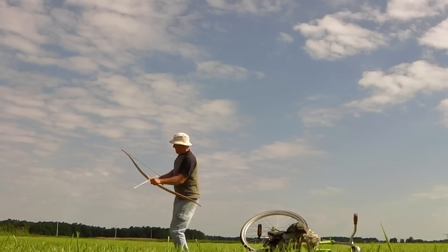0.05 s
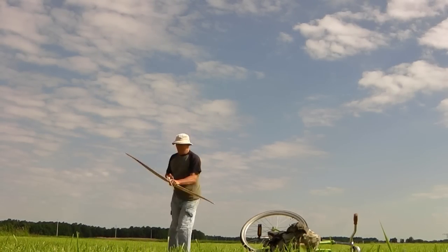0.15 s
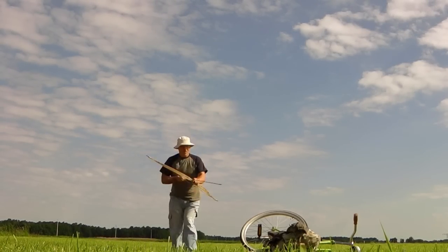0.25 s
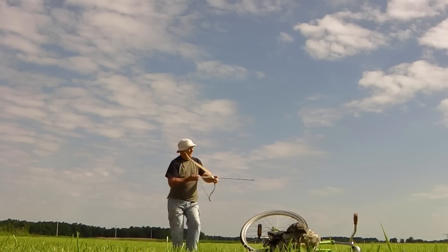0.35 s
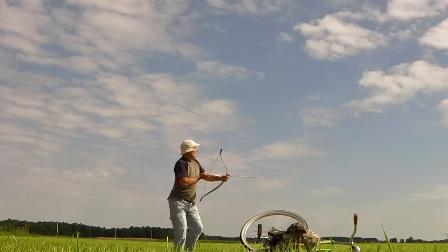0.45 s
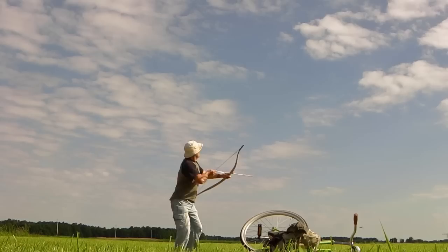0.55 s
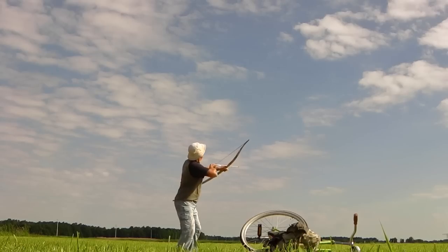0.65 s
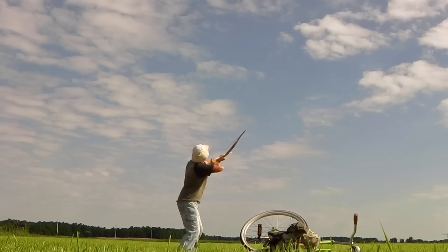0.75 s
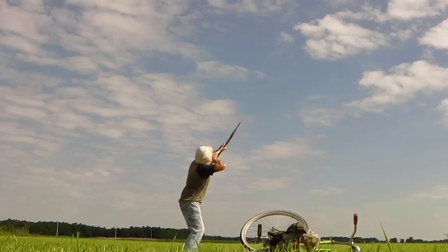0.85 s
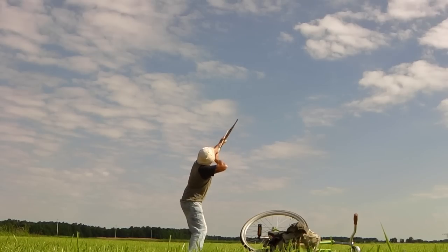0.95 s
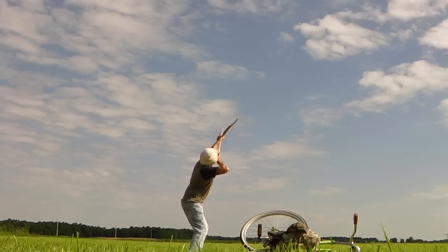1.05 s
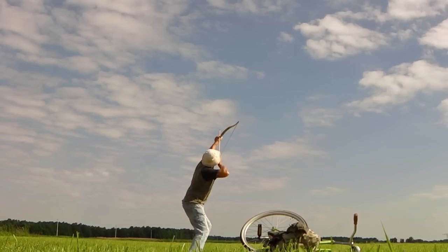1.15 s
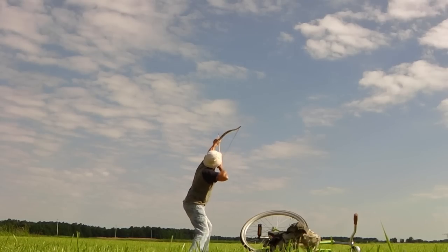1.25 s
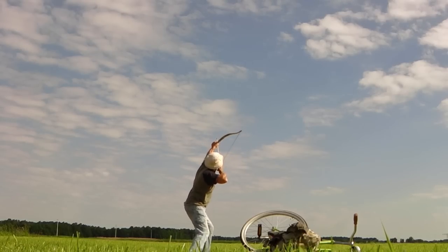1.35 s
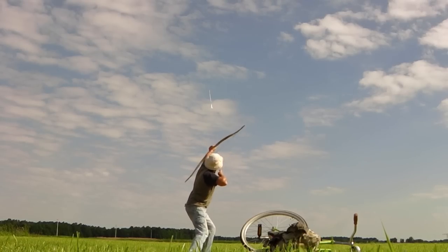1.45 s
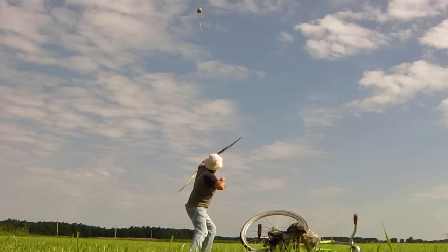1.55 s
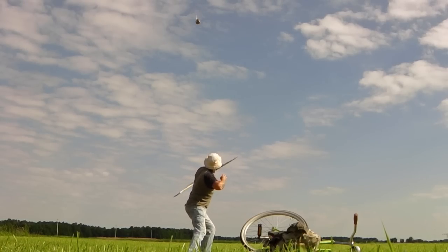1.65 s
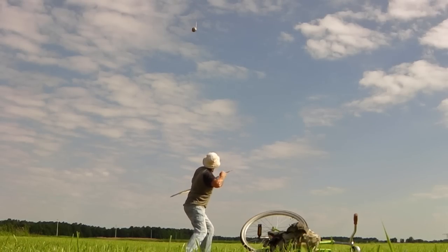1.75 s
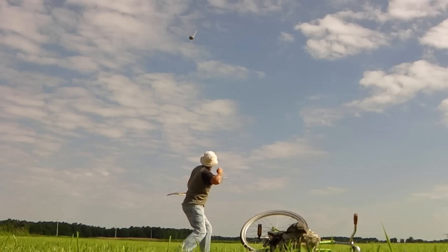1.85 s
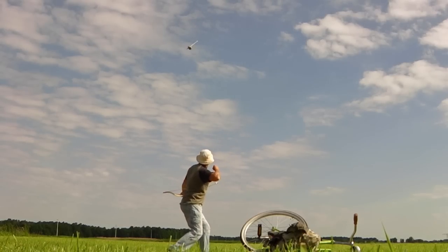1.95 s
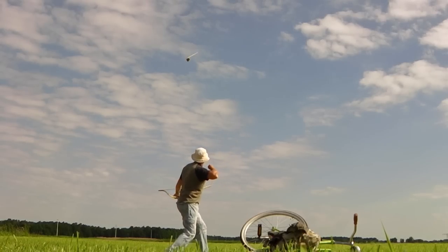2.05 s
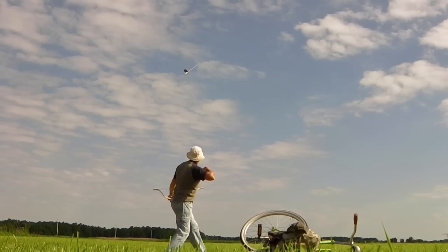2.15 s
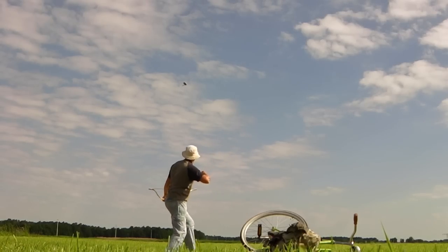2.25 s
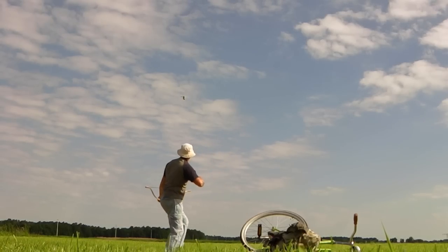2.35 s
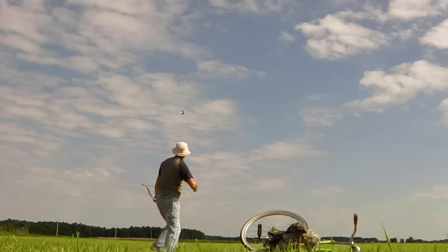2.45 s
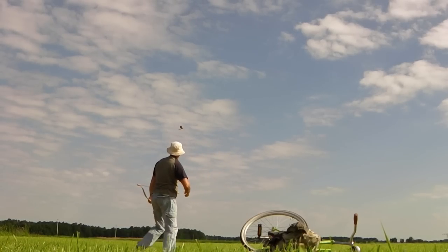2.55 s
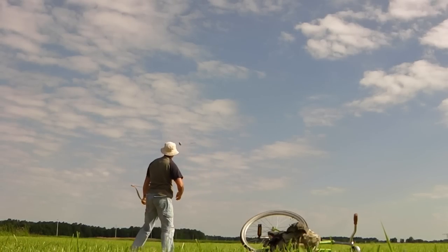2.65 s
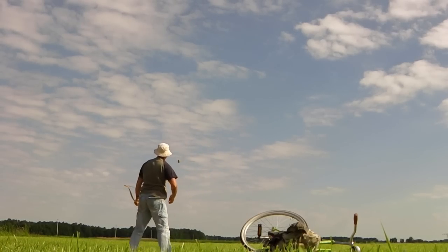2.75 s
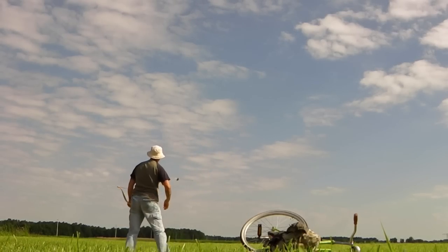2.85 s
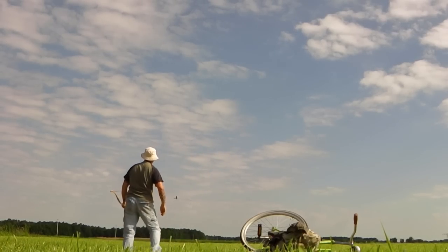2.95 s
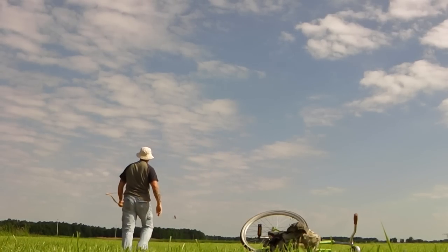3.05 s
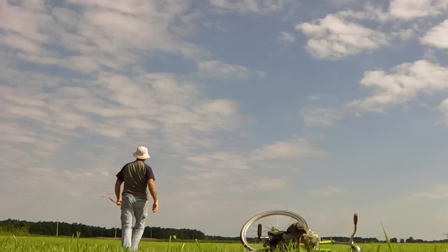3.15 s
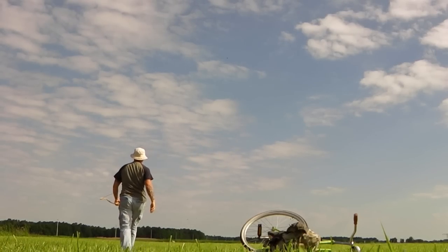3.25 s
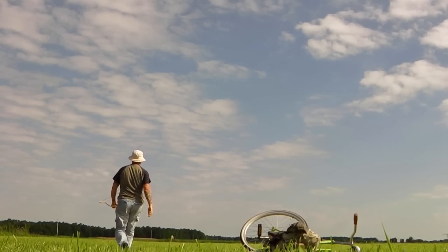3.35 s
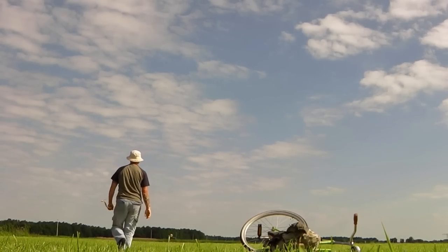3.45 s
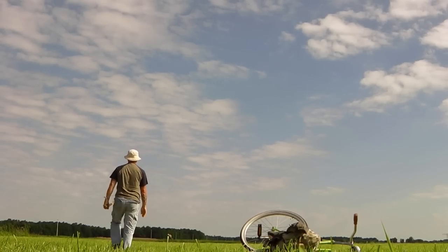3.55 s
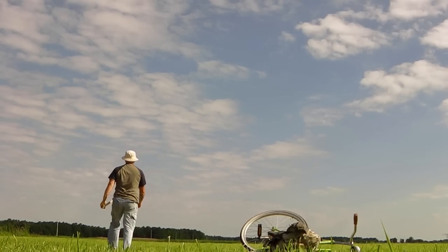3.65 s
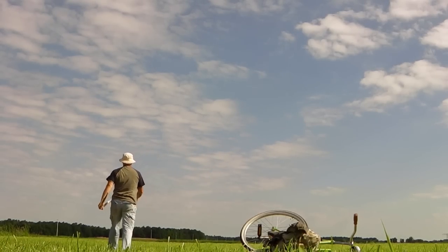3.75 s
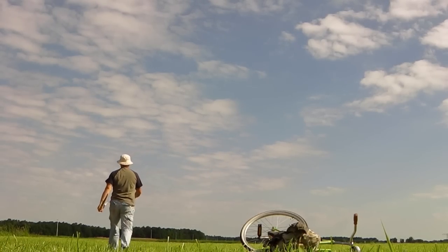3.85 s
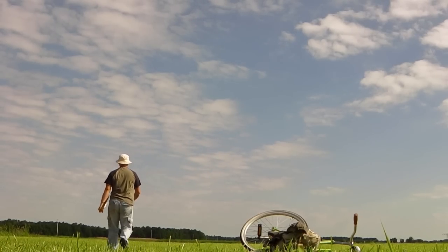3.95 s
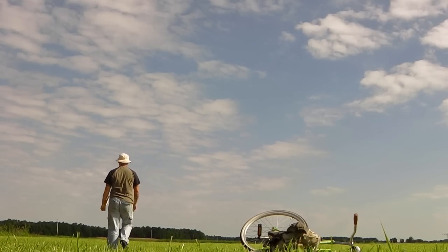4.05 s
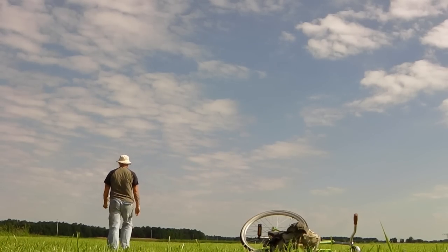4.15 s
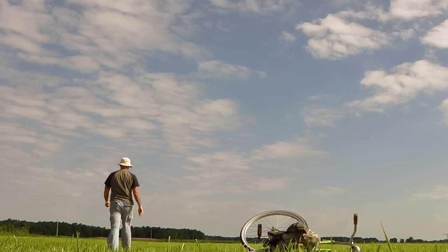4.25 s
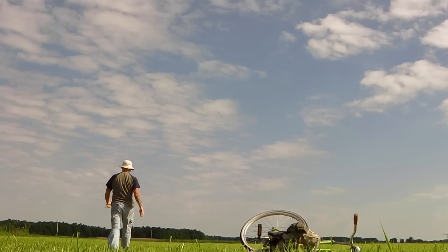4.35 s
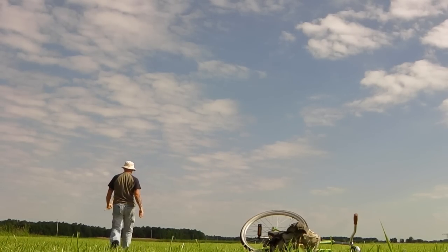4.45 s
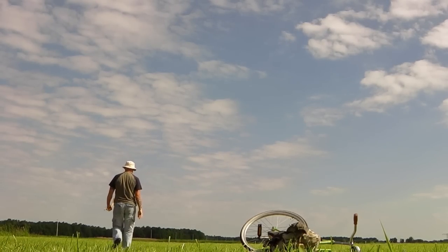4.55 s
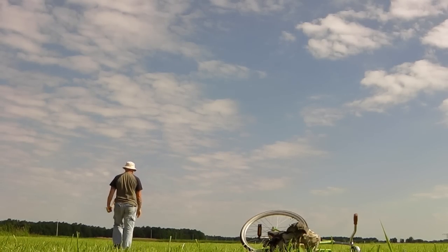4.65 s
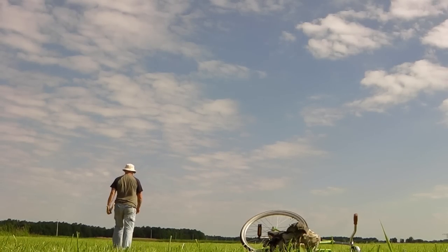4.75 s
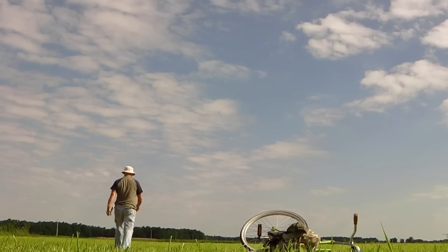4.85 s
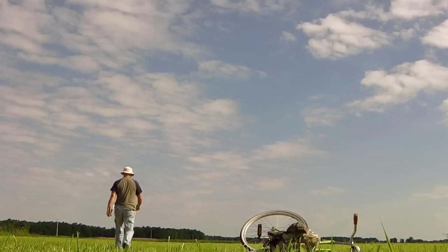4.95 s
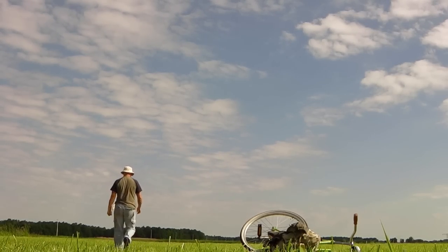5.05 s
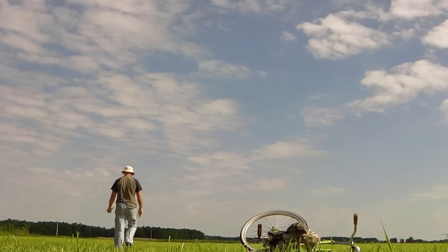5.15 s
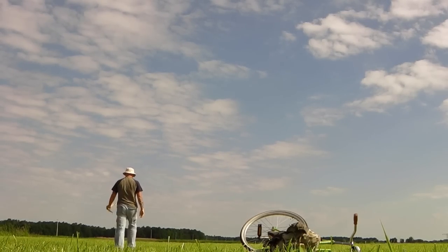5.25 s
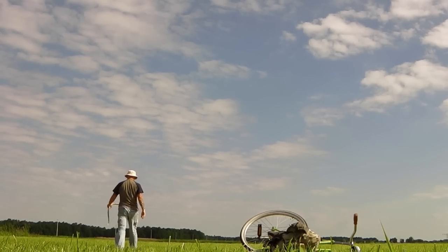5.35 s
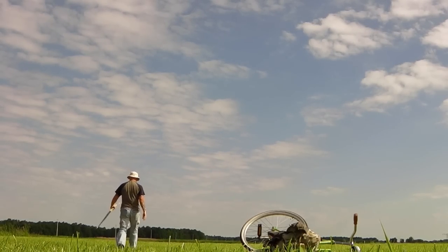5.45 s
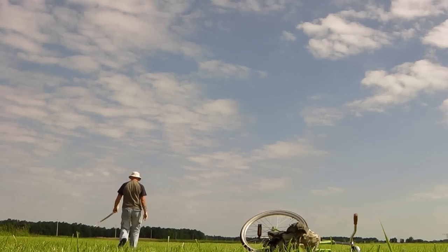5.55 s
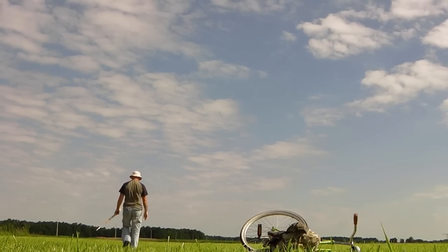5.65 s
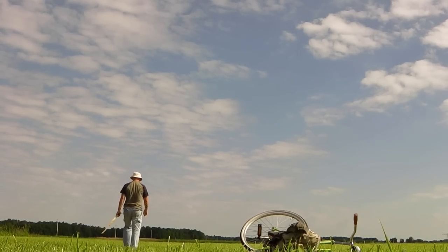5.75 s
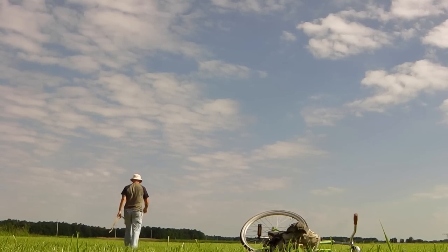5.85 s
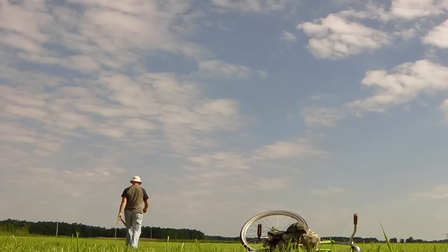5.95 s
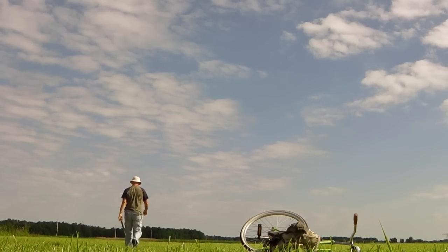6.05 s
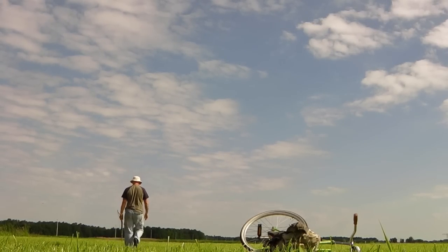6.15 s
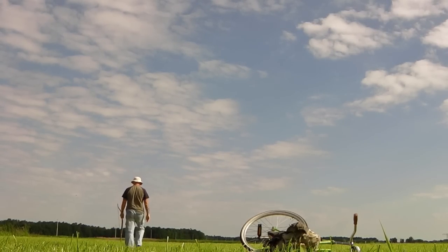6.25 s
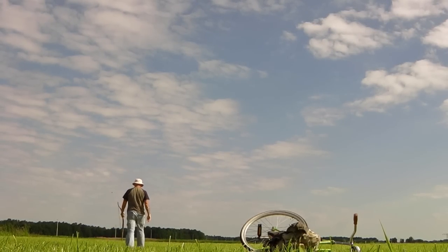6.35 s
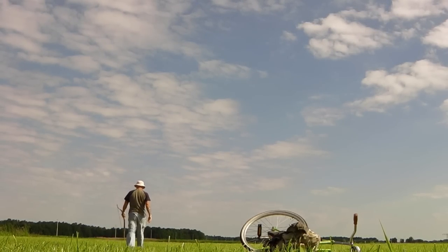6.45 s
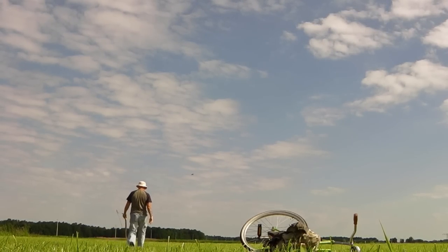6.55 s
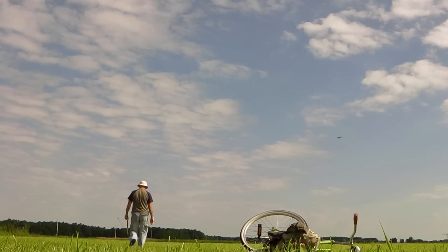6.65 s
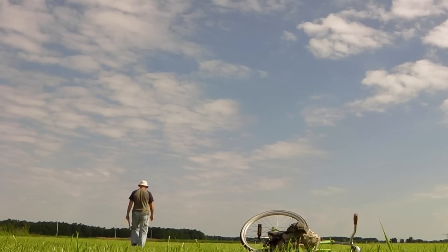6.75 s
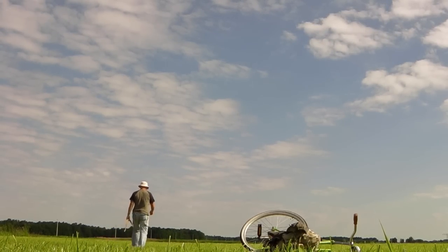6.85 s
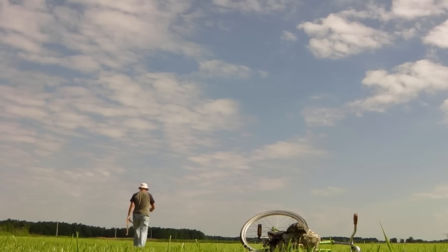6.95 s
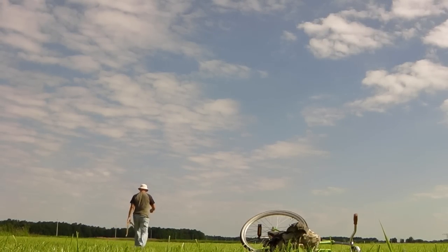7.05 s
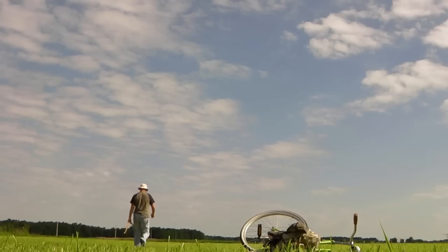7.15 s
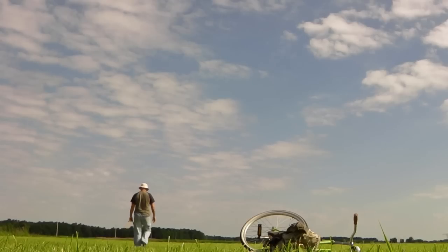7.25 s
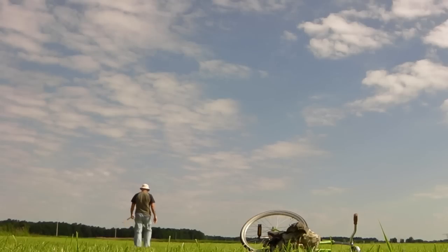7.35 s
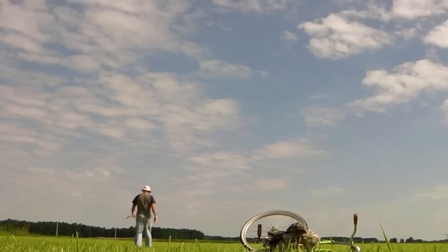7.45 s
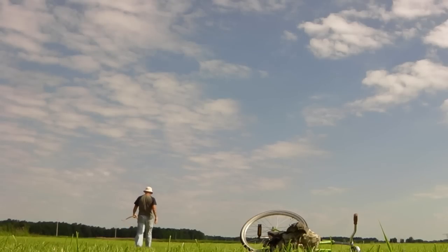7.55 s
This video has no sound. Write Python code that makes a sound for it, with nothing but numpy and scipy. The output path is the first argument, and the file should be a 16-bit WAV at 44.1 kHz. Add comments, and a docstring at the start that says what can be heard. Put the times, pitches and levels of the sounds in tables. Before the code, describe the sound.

A lark sings thinly over an open grassy field, its notes smeared by a faint scattered tail and a haze of twitter. A bow is loosed early: a bright crack, short woody ring, then a hard low-bodied knock, echoed weakly. Afterwards there are only birdsong, faint grass swishes, occasional muffled thuds and low airy background. The shot is dry and close to the stereo microphone; the bird is much softer.

```python
"""A bow shot in an open field: noise bursts make the string snap and the arrow crack, damped sine modes
make the bow ring and the target knock, then knock again more weakly like an echo. A lark sings in gliding
sines: chirps, trills, long whistles and falling chips, with a scattered tail. A haze of faint twitter near
4 kHz swells and fades like a blurred echo of the lark. Shaped stereo noise gives distant rumble and air
hiss; grass and gear tick and swish, soft thuds and pings ring."""
import sys
import numpy as np
from scipy import signal
from scipy.fft import rfft, irfft, next_fast_len
from scipy.io import wavfile
from scipy.ndimage import uniform_filter1d, map_coordinates

SR = 44100
rng = np.random.default_rng(int(sys.argv[2]) if len(sys.argv) > 2 else 0)


def unload_wav(signal):
    """Save mono or channel-first audio to the path in sys.argv[1] as 16-bit WAV at rate SR, clipped to [-1, 1]."""
    wavfile.write(
        sys.argv[1],
        SR,
        np.round(np.clip(np.atleast_2d(signal).T, -1, 1) * 32767).astype(np.int16),
    )


N = 335160  # length in samples


def amp(db):
    """Gain of a level in dB."""
    return 10 ** (np.asarray(db) / 20)


def unit(x):
    """x at rms 1."""
    return x / np.sqrt(np.mean(x ** 2) + 1e-20)


def along(points, hz):
    """Read (frequency, value) points on a log frequency axis."""
    f, v = np.transpose(points)
    return np.interp(np.log(hz + 1), np.log(f + 1), v)


def curve(rows):
    """One value per sample from (time, value) rows."""
    return np.interp(np.arange(N) / SR, *np.transpose(rows))


def wobble(rate):
    """A smooth random curve, rate knots a second."""
    knots = rng.standard_normal(int(N * rate / SR) + 4)
    return map_coordinates(knots, [np.arange(N) * rate / SR])


def filtered(x, response):
    """x times a complex response of frequency."""
    n = x.shape[-1]
    m = next_fast_len(n + 8192)  # padding keeps the filter's ringing from wrapping round
    return irfft(rfft(x, m) * response(np.fft.rfftfreq(m, 1 / SR)), m)[..., :n]


def add(track, s, sound):
    """Mix a sound into the track at s seconds."""
    part = track[..., round(s * SR):][..., :sound.shape[-1]]
    part += sound[..., :part.shape[-1]]


def chirp(length, start_hz, end_hz):
    """One gliding sine note with soft ends."""
    t = np.arange(int(length * SR)) / SR
    cycles = start_hz * t + (end_hz - start_hz) * t ** 2 / (2 * length) + rng.random()
    return np.hanning(len(t)) * np.sin(2 * np.pi * cycles)


def ringing(blows, modes, attack, scatter_db):
    """Each blow rings the modes; a harder contact tilts the strength toward the high ones."""
    out, t = np.zeros(N), np.arange(SR // 4) / SR
    for s, db, tilt_db in blows:
        ring = np.zeros(len(t))
        for hz, level, t60 in modes:
            tilt = tilt_db * np.log2(hz / modes[0][0])  # octaves from the first mode
            strength = level + tilt + scatter_db * rng.standard_normal()
            ring += amp(strength - 60 * t / t60) * np.sin(2 * np.pi * hz * t)
        add(out, s, amp(db) * ring * (1 - np.exp(-t / attack)))
    return out


def single_notes(rows, attack):
    """One damped mode for each (time, level, frequency, t60) row."""
    out = np.zeros(N)
    for s, db, hz, t60 in rows:
        out += ringing([(s, db, 0)], [(hz, 0, t60)], attack, scatter_db=0)
    return out


def bursts(rows):
    """Band-limited noise that rises, holds and dies away, slightly different at left and right microphone."""
    out, t = np.zeros((2, N)), np.arange(SR // 8) / SR
    for s, db, low_hz, high_hz, rise, hold, t60 in rows:
        band = lambda hz: 1 / ((1 + (low_hz / (hz + 1)) ** 12) * (1 + (hz / high_hz) ** 6))
        mid, side = unit(filtered(rng.standard_normal((2, len(t))), band))
        decay_db = 60 * np.clip(t - rise - hold, 0, None) / t60
        shape = amp(db - 3.0 - decay_db) * np.clip(t / rise, 0, 1)  # row level less 3 dB is the held rms
        add(out, s, shape * np.array([mid + 0.21 * side, mid - 0.079 * side]))
    return out


# Likeness of the left and right microphone: (frequency [Hz], correlation [0 to 1])
LIKENESS = [(25, .68), (60, .76), (130, .7), (290, .58), (640, .36), (1400, .22), (3100, .22), (6800, .15),
            (15000, .1)]


def rush(spectrum):
    """Stereo noise of rms 1: mid and side shares make it more alike in the bass than in the treble."""
    turn = lambda hz: np.arccos(np.clip(along(LIKENESS, hz), -1, 1)) / 2
    response = lambda hz: amp(along(spectrum, hz)) * [np.cos(turn(hz)), np.sin(turn(hz))]
    mid, side = filtered(rng.standard_normal((2, N)), response)
    return unit(np.array([mid + side, mid - side]))


# Distant rumble as it swells: (time [s], level [dB rms])
RUMBLE_LEVEL = [(0, -51.5), (.3, -54.5), (1.0, -54), (1.3, -50), (2.1, -53), (2.7, -54), (3.8, -58),
                (4.1, -54), (4.9, -54), (5.19, -50.5), (5.5, -52.5), (5.97, -54), (6.3, -52), (6.9, -53),
                (7.3, -54), (7.6, -54)]
# Colour of the rumble, then of the air: (frequency [Hz], relative level per Hz [dB])
RUMBLE_SPECTRUM = [(12, -70), (22, -38), (31, -23), (42, -6), (52, -14), (62, 2.5), (80, -4), (105, -7),
                   (135, -14), (220, -16), (290, -39), (480, -120)]
AIR_SPECTRUM = [(90, -20), (150, -6.5), (280, -6), (400, -6.5), (670, -11), (1150, -13.5), (2000, -15.5),
                (3500, -15.5), (5500, -19), (8000, -19.5), (11000, -22), (12000, -24.5), (15600, -26.5)]
AIR_DB = -55.5  # middle level of the hiss, rms


def field():
    """Open-field background: low noise that swells and lumps under a smooth, slightly wavering hiss."""
    lumps = amp(1.15 * wobble(17))
    rumble = amp(curve(RUMBLE_LEVEL)) * unit(lumps * rush(RUMBLE_SPECTRUM))
    air = amp(AIR_DB + 0.8 * wobble(7.1)) * rush(AIR_SPECTRUM)
    return rumble + air


# Haze of faint twitter as it swells and fades: (time [s], level [dB rms])
HAZE_LEVEL = [(0, -70), (1.0, -74), (1.08, -65), (1.3, -68), (1.36, -76), (1.48, -63), (1.8, -69),
              (2.2, -71), (2.36, -63), (2.45, -69), (3.2, -69), (4.6, -79), (4.8, -65.5), (5.5, -75),
              (6.05, -70), (6.4, -76), (7.35, -67), (7.6, -70)]
HAZE_HZ = 4000  # middle pitch


def twitter_haze(count):
    """Many faint overlapping notes, spread left and right, blur like an echo of the lark."""
    out = np.zeros((2, N))
    for when, pitch, glide, size, side in zip(rng.random(count), *rng.standard_normal((4, count))):
        hz = HAZE_HZ * np.exp(.04 * pitch)
        note = chirp(0.0161, hz * (1.04 + 0.038 * glide), hz * (.96 - 0.039 * glide))
        balance_db = 6.0 * side * np.array([[1], [-1]])
        add(out, when * N / SR, amp(0.99 * size + balance_db) * note)
    return amp(curve(HAZE_LEVEL)) * unit(out)


# Small hard parts: (time [s], level [dB], frequency [Hz], t60 [s])
PING_ROWS = [(.013, -56, 11400, 0.089), (.039, -53, 11400, .08), (.0515, -34.5, 10100, 0.013),
             (1.53, -26, 9500, 0.013), (1.5365, -25, 3240, 0.027)]


def pings():
    """Small hard parts ring, each on one damped note."""
    return single_notes(PING_ROWS, attack=.0008)


# Ticks and swishes of grass and gear:
# (time [s], level 3 dB above the held rms [dB], low edge [Hz], high edge [Hz], rise and hold together [s])
RUSTLE_ROWS = [(0.033, -48, 5500, 14000, .002), (0.044, -57, 5500, 14000, .017),
               (.202, -58, 9000, 11000, .01), (.241, -49, 4000, 15500, .004),
               (.251, -48.5, 4000, 15500, .003), (.273, -50, 2200, 4200, .002),
               (.938, -56.5, 7000, 13000, .004), (3.12, -65, 7500, 11000, .1),
               (3.228, -63, 7500, 11000, .087), (3.587, -50.5, 5500, 15000, .002)]
RUSTLE_RISE, RUSTLE_T60_S = 0.37, .024  # share of the length spent rising; dying away


def rustles():
    """Grass and gear rub and tick: short noise bursts, mostly in the treble."""
    return bursts([(s, db, low_hz, high_hz, RUSTLE_RISE * length, (1 - RUSTLE_RISE) * length, RUSTLE_T60_S)
                   for s, db, low_hz, high_hz, length in RUSTLE_ROWS])


# Lark levels are those before lark() makes the direct song half a dB louder left and softer right.
# Lone notes: (time [s], length [s], start pitch [Hz], end pitch [Hz], peak level [dB])
LONE_NOTES = [(.068, .021, 4060, 3750, -60), (.353, .014, 3820, 3800, -55), (.948, .022, 5100, 5100, -62),
              (1.415, .027, 3140, 3630, -55), (1.452, .014, 5000, 5000, -62), (1.661, .01, 3400, 4170, -56),
              (2.275, .01, 3275, 2925, -57), (2.407, .021, 4900, 5500, -55), (2.42, .024, 4750, 4150, -57),
              (2.457, 0.012, 4020, 2670, -46.5), (2.487, .037, 2350, 2500, -57),
              (2.603, .01, 4700, 4700, -58), (2.653, .021, 3675, 3325, -59), (2.768, .01, 3475, 3125, -53),
              (2.788, .017, 4450, 3750, -60), (3.074, .022, 5500, 4500, -62),
              (3.465, .014, 3450, 2750, -56), (3.474, .02, 4600, 3900, -61), (3.495, .016, 3950, 3270, -58),
              (4.092, .022, 4250, 3650, -58.5), (4.817, .01, 4400, 4800, -59),
              (5.003, .009, 4400, 4800, -59), (6.262, .014, 3550, 2850, -57)]
# Trills, one note repeated at an even pace while pitch and strength drift:
# (first time [s], last time [s], notes [count], note length [s], first centre [Hz], last centre [Hz],
#  glide within a note [Hz], first level [dB], last level [dB]), before swell and scatter
TRILL_ROWS = [(.259, .276, 2, .009, 3700, 3710, 600, -52, -49),
              (1.081, 1.292, 14, .011, 3700, 3600, -1250, -55, -53),
              (1.074, 1.285, 14, 0.01, 3980, 3950, -300, -59, -60),
              (1.13, 1.252, 8, .011, 3200, 2250, -400, -53, -64),
              (1.579, 1.661, 6, 0.0087, 3510, 2600, 300, -49, -59),
              (1.939, 1.956, 2, .0097, 3400, 3420, -1330, -51, -52),
              (2.066, 2.082, 2, .0093, 3410, 3480, -1250, -56, -50),
              (2.196, 2.211, 2, .0095, 3380, 3600, -1100, -53, -52),
              (2.292, 2.369, 7, .0095, 3600, 3590, -1250, -48.5, -47.5),
              (2.284, 2.376, 8, 0.0087, 3850, 3700, -1100, -54, -52),
              (2.475, 2.492, 2, .01, 3300, 3400, -1200, -57, -59),
              (2.544, 2.576, 3, .018, 5100, 4950, -350, -59, -60),
              (2.692, 2.731, 4, .011, 3290, 3600, 32, -56, -54),
              (2.849, 2.948, 7, .009, 3500, 2600, -300, -57, -60),
              (3.143, 3.154, 2, .01, 3860, 3725, -500, -51, -55),
              (3.197, 3.207, 2, .011, 3410, 3380, -900, -57, -52),
              (3.52, 3.533, 2, 0.0086, 3580, 3220, -200, -50.5, -50),
              (3.585, 3.63, 5, .012, 5300, 4600, -300, -63, -57),
              (3.664, 3.698, 4, .011, 4000, 3800, -300, -58, -51),
              (3.714, 3.831, 9, 0.0061, 3400, 3210, 1000, -49.5, -52),
              (5.96, 5.995, 2, .012, 3600, 3690, 600, -54, -50),
              (6.035, 6.25, 7, .009, 3720, 3620, 800, -47, -49.5),
              (6.049, 6.225, 6, 0.02, 3050, 3270, -800, -57, -50),
              (5.975, 6.229, 8, .013, 3780, 3780, -200, -59, -60)]
SWELL_DB = 2  # a trill is stronger in its middle
UNEVEN_DB, UNEVEN_PITCH = 1.5, .012  # scatter from note to note; pitch as a share
# Steep falling chips, each after a soft lead-in:
# (time [s], length [s], peak level [dB], lead-in level before scatter [dB])
CHIP_ROWS = [(4.79, .012, -47.5, -63), (4.883, 0.014, -48.5, -60), (4.976, .011, -49, -65),
             (5.069, .012, -48, -67), (5.17, .013, -48, -65), (5.266, 0.015, -47.5, -59),
             (5.378, .016, -48, -57), (6.869, .009, -53, -68), (6.957, .011, -51.5, -66),
             (7.048, .012, -50.5, -63), (7.14, .013, -48, -65), (7.234, .015, -48, -60),
             (7.337, 0.014, -47.5, -58.5), (7.443, .015, -49, -55)]
CHIP_START_HZ, CHIP_END_HZ = 4280, 2810
# The lead-in stutters in three short, almost level notes
LEAD_S, LEAD_NOTE_S, LEAD_START_HZ, LEAD_END_HZ, LEAD_UNEVEN_DB = .042, .02, 4100, 3940, 2


def song():
    """Every short lark note as (time, length, start pitch, end pitch, peak level)."""
    notes = list(LONE_NOTES)
    for first, last, count, length, first_hz, last_hz, glide_hz, first_db, last_db in TRILL_ROWS:
        for u in np.linspace(0, 1, round(count)):
            hz = first_hz * (last_hz / first_hz) ** u * (1 + UNEVEN_PITCH * rng.standard_normal())
            db = first_db + (last_db - first_db) * u
            db += SWELL_DB * np.sin(np.pi * u) + UNEVEN_DB * rng.standard_normal()
            notes.append((first + (last - first) * u, length, hz - glide_hz / 2, hz + glide_hz / 2, db))
    for s, length, db, lead_db in CHIP_ROWS:
        for ahead in LEAD_S * np.array([3, 2, 1]) / 3:
            level = lead_db + LEAD_UNEVEN_DB * rng.standard_normal()
            notes.append((s - ahead, LEAD_NOTE_S, LEAD_START_HZ, LEAD_END_HZ, level))
        notes.append((s, length, CHIP_START_HZ, CHIP_END_HZ, db))
    return notes


# Lark sound scattered off the grass: (level [dB], t60 [s])
GRASS_SCATTER = (-6.5, 0.12)


def scattered(x):
    """A diffuse decaying-noise tail, different at each microphone."""
    db, t60 = GRASS_SCATTER
    t = np.arange(SR // 3) / SR
    tail = rng.standard_normal((2, len(t))) * amp(-60 * t / t60)
    return amp(db) * signal.fftconvolve(x[None], tail / np.linalg.norm(tail[0]), axes=1)[:, :N]


# Long whistles, one list each: (time [s], pitch [Hz], level before the waver [dB rms])
WHISTLE_ROWS = [
    [(.42, 5000, -72), (.455, 5020, -66), (.5, 4900, -70), (.54, 4800, -72)],
    [(3.89, 4800, -72), (3.91, 4750, -64), (3.95, 4590, -68), (4.0, 4700, -70), (4.035, 4620, -70),
     (4.056, 4400, -65), (4.075, 4200, -72)],
    [(4.305, 5300, -68), (4.325, 5130, -61), (4.38, 5000, -62), (4.45, 4960, -62), (4.5, 4800, -64),
     (4.535, 4630, -62), (4.552, 4490, -68)],
    [(5.63, 6170, -76), (5.66, 5970, -72), (5.7, 5300, -64), (5.73, 4850, -62), (5.745, 4700, -68)],
    [(6.425, 5300, -70), (6.46, 5120, -68), (6.51, 5120, -67), (6.55, 5000, -73), (6.6, 4800, -71),
     (6.635, 4680, -67), (6.648, 4550, -72)],
]


def lark():
    """Gliding sine notes; long whistles waver in strength on their way through the air."""
    out = np.zeros(N)
    for s, length, start_hz, end_hz, db in song():
        add(out, s, amp(db) * chirp(length, start_hz, end_hz))
    waver = amp(1.7 * wobble(45))
    for rows in WHISTLE_ROWS:
        s, hz, db = np.transpose(rows)
        t = np.arange(s[0], s[-1], 1 / SR)
        fade = np.clip(np.minimum(t - s[0], s[-1] - t) / 0.0052, 0, 1)
        pitch = uniform_filter1d(np.interp(t, s, hz), size=900, mode="nearest")  # rounded bends
        level = np.sqrt(2) * amp(np.interp(t, s, db)) * fade * waver[round(s[0] * SR):][:len(t)]
        add(out, s[0], level * np.sin(2 * np.pi * np.cumsum(pitch) / SR))
    direct = out * amp([[.5], [-.5]])  # dB at left and right
    return direct + scattered(out)


# Soft thuds: (time [s], level [dB], frequency [Hz], t60 [s])
THUD_ROWS = [(.268, -45, 89.5, 0.17), (1.322, -42, 74.6, 0.12), (2.244, -34, 79, 0.14),
             (2.293, -38, 72, 0.11), (2.292, -46, 208, 0.055), (3.068, -40, 72, 0.048),
             (4.75, -32.5, 450, 0.018), (4.755, -37.5, 130, 0.059), (5.781, -41.5, 110, 0.06),
             (6.949, -36.5, 104, 0.086)]


def thuds():
    """Soft thuds, each one damped mode, mostly low."""
    return single_notes(THUD_ROWS, attack=0.0022)


# Cracks of string and arrow: (time [s], level 3 dB above the held rms [dB], low edge [Hz], high edge [Hz],
# rise [s], hold [s], t60 [s])
SNAP_ROWS = [(1.509, -48, 4500, 9000, .003, .001, .02), (1.515, -38, 3280, 5200, .0005, .0018, 0.034),
             (1.5289, -25.5, 4060, 12500, 0.0023, .00083, 0.0079),
             (1.535, -36, 600, 4040, .00065, .0013, 0.023), (1.542, -38.5, 2220, 4070, .0023, 0.012, 0.067),
             (1.549, -42, 390, 890, .0044, 0.0065, .084), (1.686, -22, 4320, 11500, .00036, 0.0015, .012),
             (1.707, -25.5, 300, 2900, .0004, .003, 0.018), (1.717, -50, 4500, 11000, .003, .011, .05),
             (1.742, -43, 300, 3500, .0011, .0058, 0.063)]
TAIL_DB, TAIL_T60_S = -20.5, 0.14  # tail relative to its crack; dying away


def snaps():
    """String and arrow crack as noise bursts, and every crack leaves a weak scattered tail."""
    tails = [(s, db + TAIL_DB, low_hz, high_hz, rise + hold, hold, TAIL_T60_S)
             for s, db, low_hz, high_hz, rise, hold, _ in SNAP_ROWS]
    return bursts(list(SNAP_ROWS) + tails)


# Jolts of the bow as the string runs home: (time [s], level [dB], tilt [dB per octave])
BOW_JOLTS = [(1.543, -43, -1), (1.552, -41, 2.5), (1.5553, -29, -1.5)]
# Modes of the bow: (frequency [Hz], relative level [dB], t60 [s])
BOW_MODES = [(221, 0, .085), (522, -4, .06), (1180, -16, .03), (2186, -11, .09), (2643, -5, .06),
             (3130, -7, .046), (3980, -12, .035)]


def bow():
    """The string's jolts ring the damped modes of the bow."""
    return ringing(BOW_JOLTS, BOW_MODES, attack=.0008, scatter_db=1.2)


# Arrow into target, then a weaker second knock like an echo:
# (time [s], level [dB], tilt [dB per octave])
TARGET_KNOCKS = [(1.7073, -17, 0), (1.7097, -26, 1), (1.7442, -28, -3)]
# Modes of the target: (frequency [Hz], relative level [dB], t60 [s])
TARGET_MODES = [(545, -5, 0.01), (710, 0, 0.013), (1310, -14, 0.01), (1700, -11, 0.012), (2536, -2, 0.014),
                (2950, -17, .012), (3920, -19, 0.0095)]
# The whole target gives way just after a knock: (time [s], level [dB], frequency [Hz], t60 [s])
TARGET_PUSH = [(1.7093, -10, 267, 0.012), (1.7458, -36, 275, 0.028)]


def target():
    """The knocks ring the target's short modes, and the whole target gives way on a low note."""
    knocks = ringing(TARGET_KNOCKS, TARGET_MODES, attack=.0003, scatter_db=.5)
    return knocks + single_notes(TARGET_PUSH, attack=.0015)


def scene():
    """The shot, the lark with its haze, and the field."""
    background = field() + twitter_haze(count=2400)
    shot = snaps() + bow() + target()
    return background + pings() + rustles() + lark() + thuds() + shot


TOP_HZ = 15780


def record(dry):
    """Nothing sounds above 15.8 kHz."""
    return filtered(dry, lambda hz: hz < TOP_HZ)


dry = scene()
out = record(dry)
unload_wav(out)
```